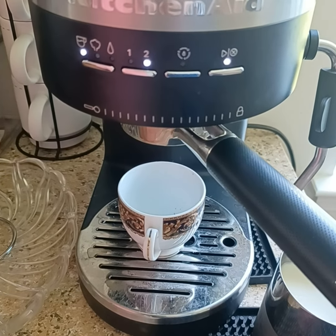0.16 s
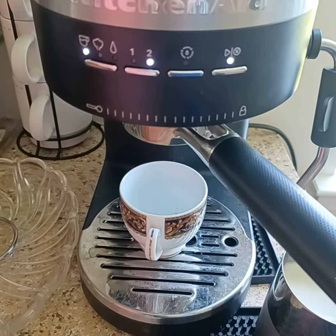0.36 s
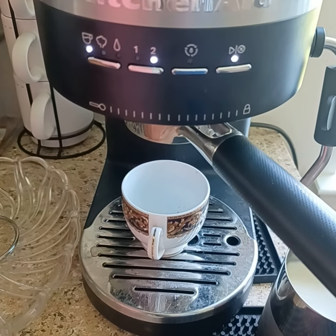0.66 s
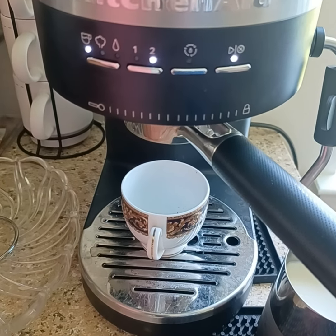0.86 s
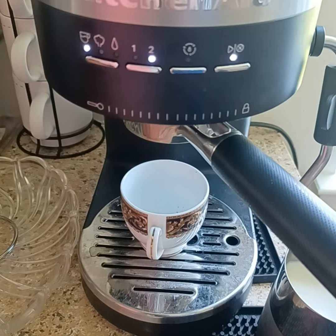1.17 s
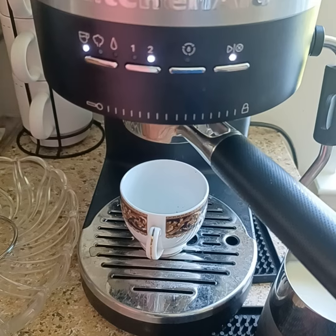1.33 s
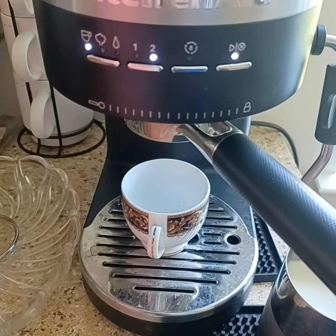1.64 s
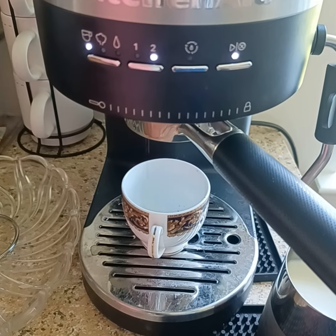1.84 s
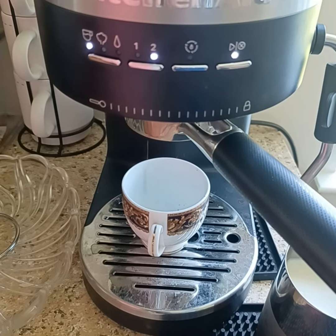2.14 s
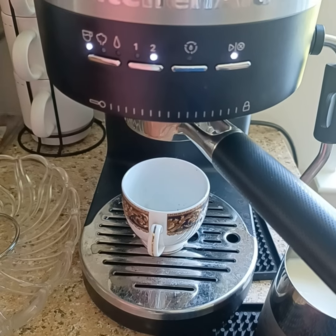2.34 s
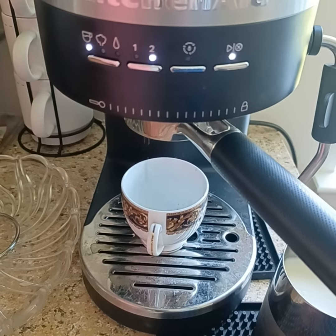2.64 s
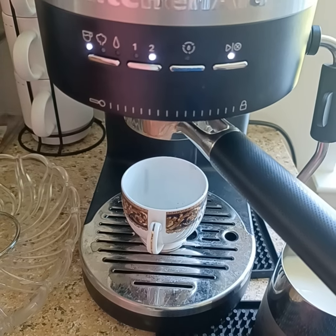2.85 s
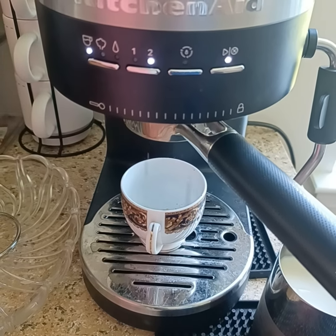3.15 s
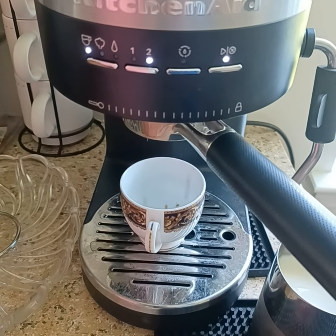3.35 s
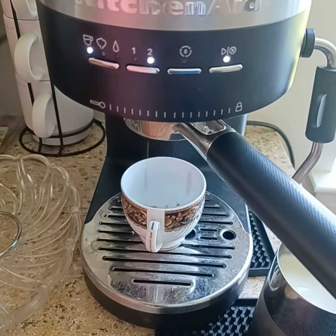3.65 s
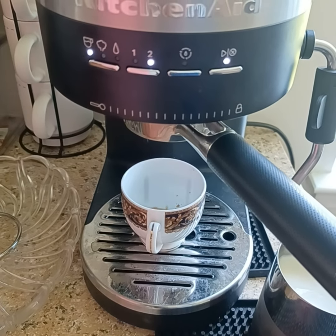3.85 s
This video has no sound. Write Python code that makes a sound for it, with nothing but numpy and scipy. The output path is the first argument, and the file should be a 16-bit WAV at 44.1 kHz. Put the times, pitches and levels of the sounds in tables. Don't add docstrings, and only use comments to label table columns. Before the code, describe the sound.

An espresso machine's vibrating pump buzzes close to a stereo microphone while water hisses and spits; near two seconds it stops with soft bumps, leaving faint fridge hum and tiny drips in a small kitchen.

```python
import sys
import numpy as np
from scipy import signal
from scipy.fft import rfft, irfft
from scipy.io import wavfile
from scipy.ndimage import uniform_filter1d

SR = 44100
rng = np.random.default_rng(int(sys.argv[2]) if len(sys.argv) > 2 else 0)


def convert_level_to_amplitude(level_db):
    exponent = np.asarray(level_db, float) / 20
    return 10 ** exponent


def pcm_store(signal):
    levels = np.round(np.clip(np.atleast_2d(signal), -1, 1) * 32767)
    wavfile.write(sys.argv[1], SR, levels.astype(np.int16).T)


N = 176400
TIME = np.arange(N) / SR
HZ = np.fft.rfftfreq(N, 1 / SR) + 1e-3

# pitch in Hz, rms level in dB, wobble in dB.
FRIDGE_TONES = [(120.2, -56, 1.4), (240.0, -72.5, 3), (360, -73, 1.5), (450, -78.5, 1.5), (843, -80.5, 3.5),
                (1088, -81, 1.5), (2265, -83, 3.5)]
# time in seconds, level in dB.
FRIDGE_SWELL = [(2.2, -1), (2.7, -0.5), (3.2, 0.5), (3.6, -0.5), (3.85, -1.5), (4, -4)]
# frequency in Hz, density in dB per Hz.
AIR_LOW = [(35, -30), (64, -16.5), (140, -16.5), (200, -14.5), (280, -13.5), (400, -22), (800, -17.5),
           (1000, -25)]
AIR_HIGH = [(1000, -3.5), (2200, -6), (2800, -19), (3500, -18.5), (4800, -22), (5300, -31.5), (7000, -27.5),
            (9000, -34.5), (15800, -32)]
# frequency in Hz, likeness from -1 to 1.
AIR_LIKENESS = [(35, .2), (60, 0.091), (180, 0.83), (550, 0.19), (1650, -0.12), (4970, -0.076),
                (15000, -0.08)]
# frequency in Hz, left over right in dB.
AIR_TILT = [(60, 13), (180, 2), (550, 2), (1650, 1), (4970, 3), (15000, 1)]
AIR_LOW_DB, AIR_HIGH_DB, AIR_PATCH_DB = -62, -66.5, 0.25
# time in seconds, level in dB.
FAR_SWELL = [(2.2, -83), (2.4, -77), (2.58, -80), (2.7, -96), (2.95, -81), (3.1, -89), (3.25, -85),
             (3.4, -78), (3.58, -77), (3.7, -88), (3.8, -99), (3.95, -98)]
# frequency in Hz, density in dB per Hz.
FAR_HISS = [(2700, 0), (3000, -8.5), (3300, 1), (3650, -6), (4600, -6), (5000, -15)]
# centre in seconds, length in seconds, level in dB, pitch in Hz.
WHINE = [(2.42, .05, -91, 3420), (2.58, .04, -89, 3600), (2.85, .08, -92, 3530), (3.1, 0.11, -83, 3490),
         (3.5, .08, -93, 3270), (3.64, .08, -88, 3460), (3.95, 0.052, -89, 3430)]
WHINE_WIDTH_HZ = 70

ROOM_DB, ROOM_T60_S, ROOM_LOW_HZ, ROOM_HIGH_HZ = -11.5, 0.46, 610, 6160
# frequency in Hz, left lead in radians.
MACHINE_LEAD = [(0, 0), (1810, 7.5), (3010, 16.5), (3620, 18.5), (4220, 17), (12500, 25.5), (14500, 31.5),
                (15300, 36)]
# frequency in Hz, left over right in dB.
MACHINE_TILT = [(60, 4), (150, 2), (380, -1), (950, 4), (2380, -0.5), (5980, 1), (15000, 2.5)]
# frequency in Hz, likeness from -1 to 1.
WATER_LIKENESS = [(35, .1), (60, 0.48), (150, 0.65), (380, 1), (950, -0.87), (2380, -0.026), (5980, -0.009),
                  (15000, 0.23)]

# start in seconds, peak in dB, pitch in Hz, decay T60 in seconds.
DROPS = [
    (2.3466, -70, 11300, 0.012),
    (2.9227, -56.5, 6240, 0.022),
    (2.9215, -65, 5200, .015),
    (2.9215, -67, 7950, 0.013),
    (2.9215, -76, 10700, .008),
    (2.9325, -66, 6650, 0.018),
    (2.9444, -75, 6780, 0.02),
    (2.926, -72, 6300, .25),
    (3.1188, -70, 10200, 0.014),
]

# start in seconds, peak in dB, length in seconds, spray in dB, deep part in dB.
SPURTS = [(0.022, -40, 0.0081, -11, -8), (0.067, -35, 0.015, -10, 4), (0.169, -46, 0.0043, -19, 7),
          (0.257, -35.5, 0.0089, -18, 5), (0.3116, -29.5, 0.0062, -10, 4), (0.337, -37, 0.0093, -11, 3),
          (0.372, -47, 0.007, -15, -3), (0.47, -41.5, 0.005, -21, 6), (0.571, -30, 0.0082, -8, 5),
          (0.632, -39, 0.0097, -10, 9), (0.8376, -35.5, 0.0047, -5.5, -6),
          (0.8427, -32.5, .006, -12.5, -3.5), (0.867, -47, 0.0115, -19, 0), (0.945, -37.5, 0.008, -19, -14),
          (0.964, -43, 0.0096, -10, -4), (1.067, -30, 0.021, -8, -1), (1.536, -32, 0.0087, -12, -17),
          (1.543, -39, 0.0041, -28, -6), (1.558, -57, 0.0072, -25, -8), (1.71, -44, 0.014, -17, -8),
          (1.736, -46, .005, -16, -12), (1.748, -42, .004, -7, -10), (1.7558, -26.5, 0.013, -6, -4),
          (1.77, -47, 0.0045, -27, -19), (1.785, -51, .005, -18, -14), (1.805, -41, 0.0081, -5.5, -10)]
# frequency in Hz, density in dB per Hz.
SPURT_COLOUR = [(880, -1), (1500, -9), (2220, -3.5), (4370, -2.5), (5640, -10), (6220, -10), (8770, -18.5),
                (9580, -27), (15600, -40)]
# frequency in Hz, density in dB per Hz.
SPRAY_COLOUR = [(2000, 11), (4000, 9.5), (8000, -5.5), (10000, -10), (13000, -7), (15800, -11.5)]
SPURT_TRIM_DB, SPURT_T60_S, SPURT_ROOM_DB, SPLASH = -13.5, 0.042, -20, 1
ATTACK_SHARE, SAG_DB = 0.2, -2.5
SPRAY_HOLD_S, SPRAY_T60_S = 0.014, 0.27
DEEP_HZ, GRAIN_RATE_HZ, GRAIN_DB = 2880, 250, 4
POPS_PER_S, POP_SHARE, POP_LOW_HZ, POP_HIGH_HZ, POP_CYCLES = 1900, 0.26, 2050, 7000, 28

# frequency in Hz, density in dB per Hz.
FLOW_COLOUR = [(35, -37), (64, -35), (105, -38), (200, -16), (330, -18.5), (420, -14), (600, -22.5),
               (1000, -16), (1500, -21.5)]
# frequency in Hz, density in dB per Hz.
HISS_COLOUR = [(880, -31), (1500, -35), (1620, -7.5), (1950, -0.5), (3450, -9.5), (6350, -18.5),
               (10600, -36), (13200, -37), (15600, -39)]
# time in seconds, level in dB.
PRESSURE = [(0.0, -71), (0.988, -72.5), (1.412, -72.5), (1.754, -72), (1.808, -76), (1.95, -71)]
FLOW_DB, FLOW_BEAT, FLOW_PATCH_DB = -47, 0.28, -0.3
HISS_DB, HISS_BEAT, HISS_PATCH_DB = -53.5, 0.15, 1.26

MAINS_HZ = 60.0
STOP_S, HUM_T60_S, RUN_DOWN_T60_S = 1.9224, 0.59, 0.29
# time in seconds, level in dB.
DRIVE = [(0, -1.5), (.3, -0.65), (.7, -0.5), (1.3, 0), (1.75, 1), (1.905, -0.5)]
# time in seconds, level in dB.
BUZZ = [(0, -0.5), (.5, -2), (.75, 0.5), (1.15, -0.5), (1.4, -1.5), (1.75, -2), (1.9, -2.5)]
# pitch in Hz, width in Hz, level in dB.
VALVE = [(738, 190, 1.5), (1025, 200, -0.5), (1310, 83, 3.5), (1785, 294, -4), (2130, 325, -7),
         (3020, 1300, -17.5)]
TAP_S, TAP_BACK_S, TAP_JITTER_S, TAP_T60_S = 0.0094, 0.0080, 0.00012, 0.0093
TAP_DB, TAP_BACK_DB, TAP_SPREAD_DB, TAP_FIZZ = -58, -4, 3, 0.55
# pitch in Hz, width in Hz, level in dB.
HOUSING = [(273, 26, -10.5), (362, 42, -9.5), (404.4, 30.6, 2.5), (448.6, 27.5, 2), (476.7, 32.5, -1),
           (584, 87, -9.5), (677, 146, -14.5), (1093, 92, -23.5), (1292, 77, -23), (1668, 20, -21)]
KNOCK_DB, RETURN_DB, KNOCK_SPREAD_DB = -39.5, -3, 2.6
PUSH_S, KNOCK_JITTER_S = 0.0068, 0.000923
RATTLE, RATTLE_T60_S = 0.44, 0.042
CONTACT_HZ, HOUSING_LOW_HZ = 2170, 231
EVEN_S, EVEN_FLOOR = 0.05, 0.13
# time in seconds, level in dB, pitch in Hz.
LAST_BUMPS = [
    (1.898, -30, 200),
    (1.963, -28, 218),
    (1.968, -34.5, 527),
    (1.994, -41, 268),
    (2.015, -45, 194),
    (2.041, -53, 290),
]
BUMP_WIDTH_HZ, BUMP_LOW_HZ = 57, 130
# multiple of mains, rms level in dB, wobble in dB, left over right in dB.
HUM = [(1, -69.5, 2, -7), (1.5, -67, -5, -4), (2, -38.5, 0.41, 1.7), (2.5, -66.5, 8.5, 0),
       (3, -47.5, 2, 0.5), (3.5, -60, 3.5, 5), (4, -48.5, 1.5, -3.5), (4.5, -58.5, -0.5, 14),
       (5, -57.5, 0.5, -3), (5.5, -74.5, 1.5, 2), (6, -52.5, 2.5, 3), (7, -49.5, 3, 8), (8, -49, 2, 9.5),
       (9, -60, -7, 12), (10, -71, 5.5, -3), (11, -59.5, -1.5, -8), (12, -62, 8, -2)]
COIL_DROP_DB, COIL_DROP_S = -5, 0.04


def rms_one(x):
    return x / np.sqrt(np.mean(x ** 2) + 1e-20)


def curve(rows):
    return np.interp(TIME, *np.transpose(rows))


def at_hz(rows):
    hz, value = np.transpose(rows)
    return np.interp(np.log(HZ), np.log(hz), value)


def filtered(x, order, hz, kind="low"):
    return signal.sosfilt(signal.butter(order, hz, kind, fs=SR, output="sos"), x)


def drift(rate):
    r = np.exp(-80 * np.pi * rate / SR)
    chance = rng.standard_normal(N // 40 + 2002)
    slow = signal.lfilter([1], [1, -2 * r, r * r], chance)[2000:]
    return np.interp(np.arange(N) / 40, np.arange(len(slow)), rms_one(slow))


def resonate(x, hz, width):
    r = np.exp(-np.pi * width / SR)
    zeros = np.array([1, 0, -1]) * (1 - r * r) / 2
    poles = [1, -2 * r * np.cos(2 * np.pi * hz / SR), r * r]
    return signal.lfilter(zeros, poles, x + 1e-18)


def fading_tail(hits, t60):
    return signal.lfilter([1], [1, -convert_level_to_amplitude(-60 / (t60 * SR))], hits)


def noise(colour, patch_db):
    inside = (HZ > colour[0][0]) * (HZ < colour[-1][0])
    lines = rfft(rng.standard_normal(N)) * convert_level_to_amplitude(at_hz(colour)) * inside
    if not patch_db:
        return rms_one(irfft(lines, N))
    band = np.floor(np.log2(HZ / 16)) // 2
    shared = drift(3.6)
    out = 0
    for k in range(5):
        flicker = convert_level_to_amplitude(patch_db * (0.5 * shared + drift(33)))
        out = out + irfft(lines * (band == k), N) * flicker
    return rms_one(out)


def wide(make, likeness, tilt):
    alike = np.clip(at_hz(likeness), -1, 1)
    mid, side = rfft([make(), make()]) * np.sqrt([(1 + alike) / 2, (1 - alike) / 2])
    half = convert_level_to_amplitude(at_hz(tilt) / 2)
    return irfft([(mid + side) * half, (mid - side) / half], N)


def ports(x, lead, tilt):
    half = convert_level_to_amplitude(at_hz(tilt) / 2) * np.exp(0.5j * at_hz(lead))
    return irfft(rfft(x) * np.array([half, 1 / half]), N)


def room_air():
    def air():
        low = convert_level_to_amplitude(AIR_LOW_DB) * noise(AIR_LOW, AIR_PATCH_DB)
        return low + convert_level_to_amplitude(AIR_HIGH_DB) * noise(AIR_HIGH, AIR_PATCH_DB)
    far = wide(lambda: noise(FAR_HISS, 0), AIR_LIKENESS, AIR_TILT)
    return wide(air, AIR_LIKENESS, AIR_TILT) + convert_level_to_amplitude(curve(FAR_SWELL)) * far


def whine():
    hiss, out = rng.standard_normal(N), 0
    for s, length, db, hz in WHINE:
        tone = resonate(resonate(hiss, hz, WHINE_WIDTH_HZ), hz, WHINE_WIDTH_HZ)
        out = out + convert_level_to_amplitude(db) * np.exp(-((TIME - s) / length) ** 2) * rms_one(tone)
    return out


def fridge():
    out = 0
    for hz, db, wobble_db in FRIDGE_TONES:
        level = np.sqrt(2) * convert_level_to_amplitude(db + wobble_db * drift(5.4))
        out = out + level * np.sin(2 * np.pi * hz * TIME + 0.15 * wobble_db * drift(4.7))
    return out * convert_level_to_amplitude(curve(FRIDGE_SWELL) + [[0.7], [-0.7]])


def kitchen(x):
    t = TIME[:SR]
    echo = rng.standard_normal((2, SR)) * convert_level_to_amplitude(-60 * t / ROOM_T60_S) * (t > 0.004)
    echo = filtered(echo, 1, [ROOM_LOW_HZ, ROOM_HIGH_HZ], "band")
    return convert_level_to_amplitude(ROOM_DB) * signal.fftconvolve(x[None], rms_one(echo) / np.sqrt(SR), axes=1)[:, :N]


def drops():
    out, t = np.zeros(N), TIME[:SR // 10]
    for s, db, hz, t60 in DROPS:
        burst = rng.standard_normal(len(t)) * convert_level_to_amplitude(-60 * t / t60)
        ring = resonate(resonate(burst, hz, 0.1 * hz), hz, 0.14 * hz)
        start = int(s * SR)
        out[start:start + len(t)] += convert_level_to_amplitude(db) * ring / np.abs(ring).max()
    return out


def pops():
    clicks = (rng.random(N) < POPS_PER_S / SR) * rng.standard_normal(N)
    dealt = rng.integers(0, 10, N)
    out = 0
    for k, hz in enumerate(np.geomspace(POP_LOW_HZ, POP_HIGH_HZ, 10)):
        out = out + resonate(clicks * (dealt == k), hz, 1.2 * hz / POP_CYCLES)
    return rms_one(out)


def spurts():
    jet, deep, spray = np.zeros((3, N))
    for s, db, length, spray_db, deep_db in SPURTS:
        t = np.maximum(TIME - s, 0)
        start = convert_level_to_amplitude(db + SPURT_TRIM_DB) * np.minimum(t / (ATTACK_SHARE * length), 1)
        sag = SAG_DB * np.minimum(t / length, 1)
        shape = start * convert_level_to_amplitude(sag - 60 * np.maximum(t - length, 0) / SPURT_T60_S)
        jet += shape
        deep += shape * convert_level_to_amplitude(deep_db)
        spray += start * convert_level_to_amplitude(spray_db - 60 * np.maximum(t - SPRAY_HOLD_S, 0) / SPRAY_T60_S)
    grain = convert_level_to_amplitude(GRAIN_DB * drift(GRAIN_RATE_HZ))
    deep_share = 1 / (1 + (HZ / DEEP_HZ) ** 8)

    def shaped(x):
        low = irfft(rfft(x) * deep_share, N)
        return grain * (deep * low + jet * (x - low))

    splash = SPLASH * shaped(wide(lambda: noise(SPURT_COLOUR, 0), WATER_LIKENESS, MACHINE_TILT))
    mist = wide(lambda: noise(SPRAY_COLOUR, 0), WATER_LIKENESS, MACHINE_TILT)
    mist = spray * convert_level_to_amplitude(GRAIN_DB / 2 * drift(120)) * mist
    return shaped(noise(SPURT_COLOUR, 0) + POP_SHARE * pops()), splash + mist


def effort(t60):
    return convert_level_to_amplitude(curve(DRIVE) - 60 * np.maximum(TIME - STOP_S, 0) / t60)


def flow():
    stroke = np.sin(4 * np.pi * MAINS_HZ * TIME + drift(8.7))
    snap = np.cos(2 * np.pi * MAINS_HZ * (TIME - TAP_S - 0.001))
    pressure = curve(PRESSURE)
    pressure = pressure - pressure[:N // 3].mean()
    rumble = wide(lambda: noise(FLOW_COLOUR, FLOW_PATCH_DB), WATER_LIKENESS, MACHINE_TILT)
    hiss = wide(lambda: noise(HISS_COLOUR, HISS_PATCH_DB), WATER_LIKENESS, MACHINE_TILT)
    rumble = convert_level_to_amplitude(FLOW_DB) * (1 + FLOW_BEAT * stroke) * rumble
    hiss = convert_level_to_amplitude(HISS_DB + pressure) * (1 + HISS_BEAT * snap) * hiss
    return (rumble + hiss) * effort(RUN_DOWN_T60_S)


def valve():
    beat = np.arange(int(4.4 * MAINS_HZ))
    chance = rng.standard_normal((len(beat), 2))
    opening = beat % 2
    at = beat // 2 / MAINS_HZ + TAP_S - TAP_BACK_S * opening + TAP_JITTER_S * chance[:, 0]
    hits = np.zeros(N)
    hits[(at * SR).astype(int)] = convert_level_to_amplitude(TAP_SPREAD_DB * chance[:, 1] + TAP_BACK_DB * opening)
    fizz = fading_tail(hits, TAP_T60_S) * rng.standard_normal(N)
    force = rms_one(hits) + TAP_FIZZ * rms_one(fizz)
    ring = 0
    for k, (hz, width, db) in enumerate(VALVE):
        ring = ring + (-1) ** k * convert_level_to_amplitude(db) * resonate(force, hz, width)
    return convert_level_to_amplitude(TAP_DB) * rms_one(ring) * np.sqrt(2) * effort(RUN_DOWN_T60_S) * (TIME < 2.2)


def even(x):
    strength = uniform_filter1d(x ** 2, int(EVEN_S * SR)) / np.mean(x ** 2)
    return x / np.sqrt(strength + EVEN_FLOOR)


def last_bumps():
    out = np.zeros(N)
    for s, db, hz in LAST_BUMPS:
        push = np.exp(-((TIME - s) * 3 * hz) ** 2)
        bump = resonate(push, hz, BUMP_WIDTH_HZ) * hz / BUMP_WIDTH_HZ
        out += convert_level_to_amplitude(db) * filtered(bump, 2, BUMP_LOW_HZ, "high")
    return out


def knocks():
    beat = np.arange(int(4.4 * MAINS_HZ))
    chance = rng.standard_normal((len(beat), 2))
    at = np.clip((beat - 1) / (2 * MAINS_HZ) + PUSH_S + KNOCK_JITTER_S * chance[:, 0], 0, 3)
    hits = np.zeros(N)
    hits[(at * SR).astype(int)] = convert_level_to_amplitude(KNOCK_SPREAD_DB * chance[:, 1] + RETURN_DB * (1 - beat % 2))
    rattle = fading_tail(hits, RATTLE_T60_S) * rng.standard_normal(N)
    force = filtered(rms_one(hits) + RATTLE * rms_one(rattle), 2, CONTACT_HZ)
    body = 0
    for k, (hz, width, db) in enumerate(HOUSING):
        body = body + (-1) ** k * convert_level_to_amplitude(db) * even(resonate(force, hz, width))
    body = filtered(rms_one(body), 4, HOUSING_LOW_HZ, "high")
    return convert_level_to_amplitude(KNOCK_DB + curve(BUZZ)) * rms_one(even(body)) * effort(RUN_DOWN_T60_S)


def hum():
    out = 0
    for k, db, wobble_db, pan_db in HUM:
        phase = (k < 6) * rng.uniform(0, 6.3) + 0.1 * wobble_db * drift(8)
        tone = np.cos(2 * np.pi * k * MAINS_HZ * (TIME - PUSH_S) + phase)
        level = np.sqrt(2) * convert_level_to_amplitude(db + wobble_db * drift(29.0) + (k > 6) * curve(BUZZ))
        pan = convert_level_to_amplitude([[pan_db / 2], [-pan_db / 2]])
        out = out + level * tone * pan * effort(HUM_T60_S if k < 6 else RUN_DOWN_T60_S)
    return out * convert_level_to_amplitude(COIL_DROP_DB * np.clip((TIME - STOP_S) / COIL_DROP_S, 0, 1))


def scene():
    behind = fridge() + room_air() + whine()
    ticks = drops()
    jet, spray = spurts()
    body = knocks() + last_bumps() + valve()
    fade = np.minimum((N - np.arange(N)) / 2000, 1)
    near = ticks + ports(body + jet, MACHINE_LEAD, MACHINE_TILT) * fade
    room = kitchen(body + convert_level_to_amplitude(SPURT_ROOM_DB) * (jet + ticks))
    return behind + room + spray + flow() + near + hum()


def low_pass(x):
    return signal.sosfilt(signal.butter(12, 15800, fs=SR, output="sos"), x)


def record(dry):
    return low_pass(dry)


dry = scene()
out = record(dry)
pcm_store(out)
```